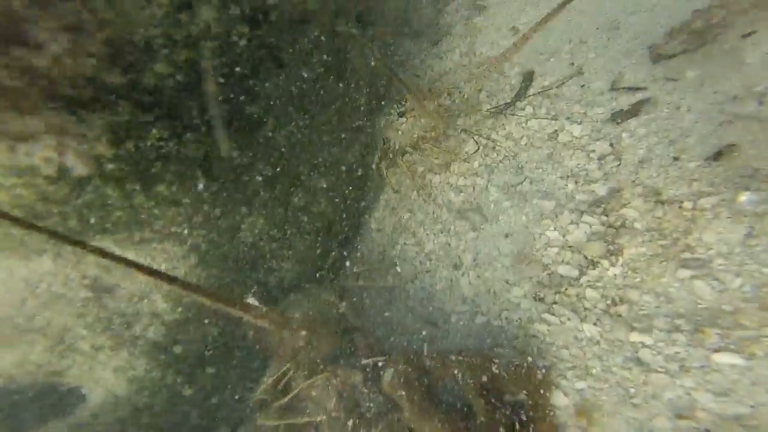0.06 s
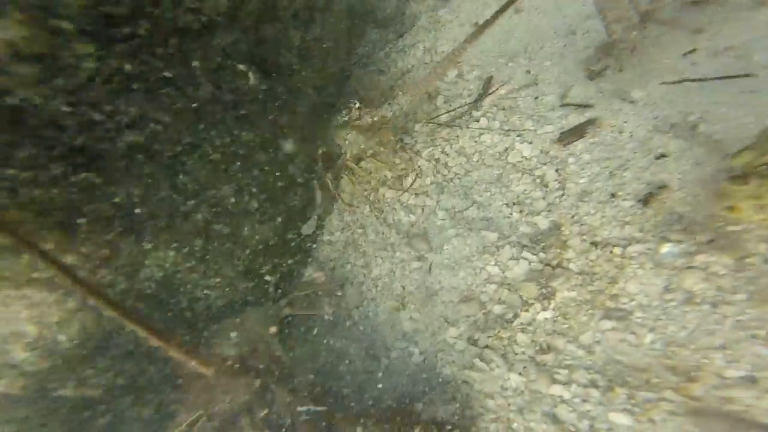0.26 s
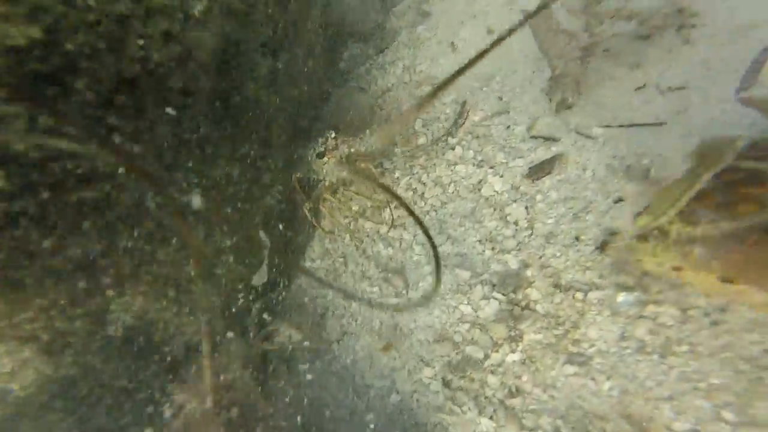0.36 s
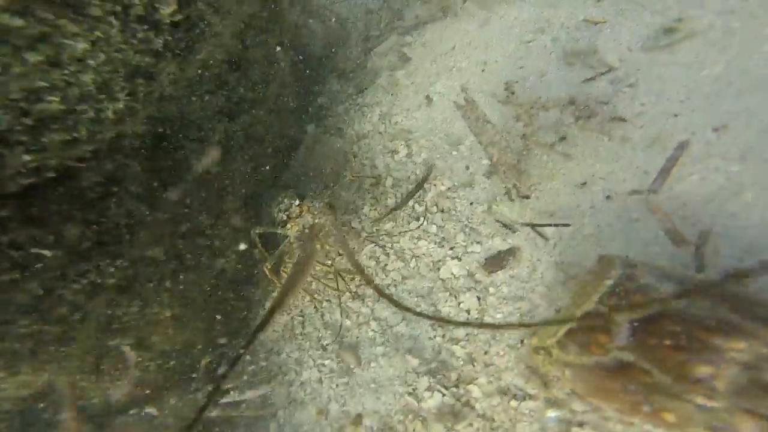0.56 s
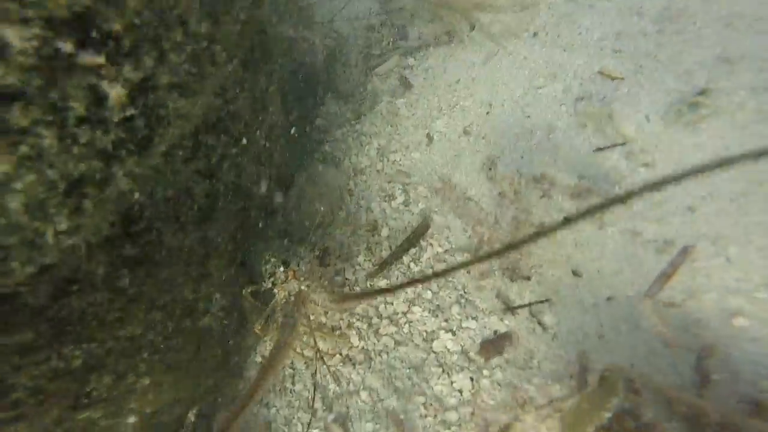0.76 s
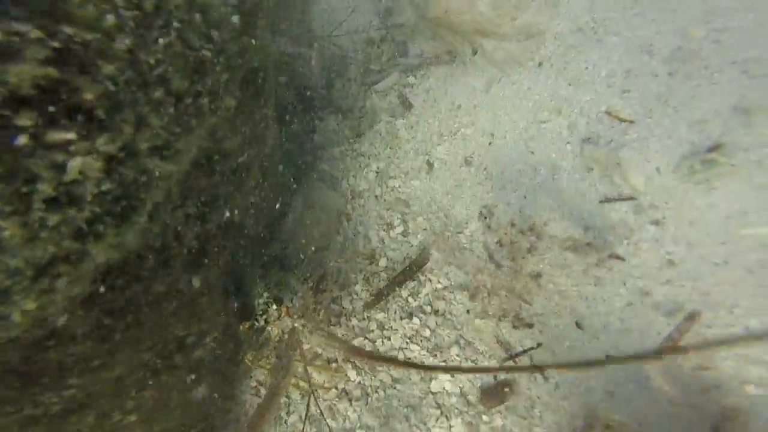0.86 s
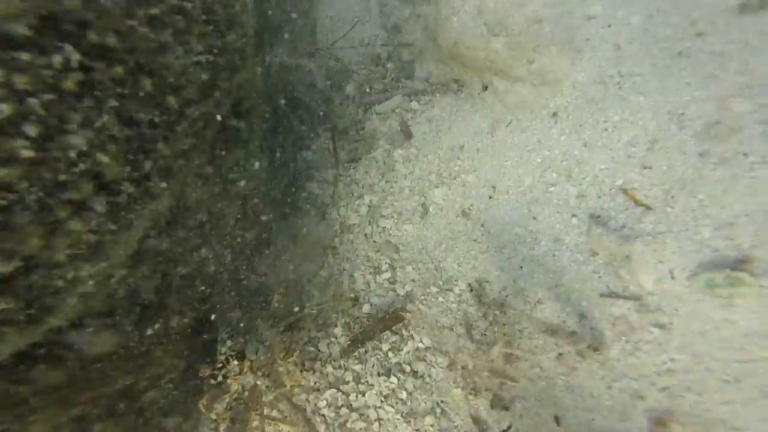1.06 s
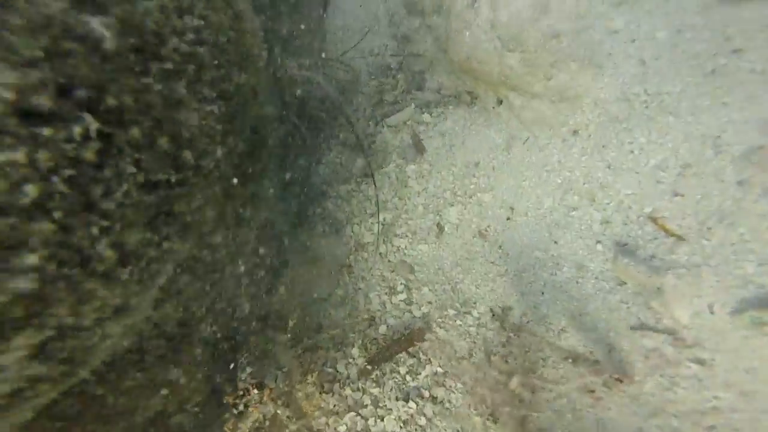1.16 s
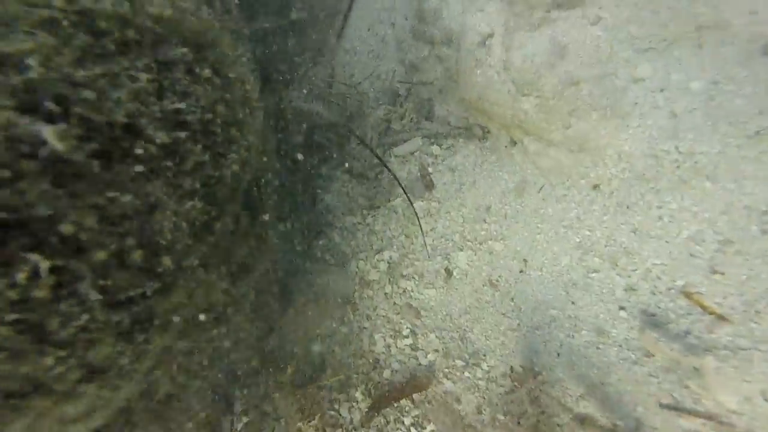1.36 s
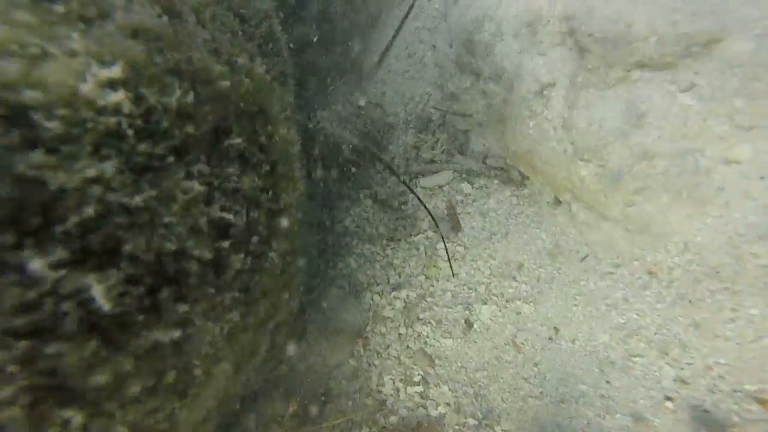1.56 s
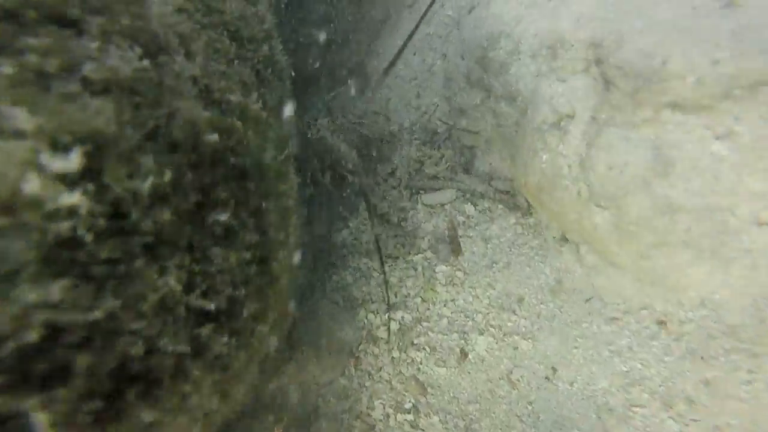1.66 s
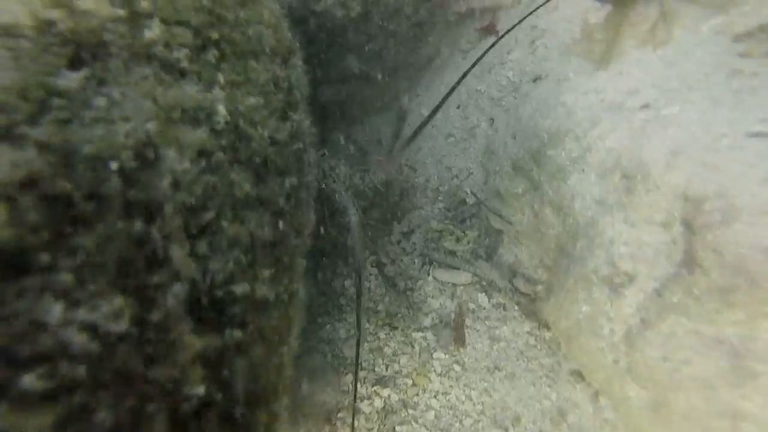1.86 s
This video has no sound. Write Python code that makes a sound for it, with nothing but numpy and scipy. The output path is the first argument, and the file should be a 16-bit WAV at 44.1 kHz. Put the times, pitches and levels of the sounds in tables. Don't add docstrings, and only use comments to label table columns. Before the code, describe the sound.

Housing scrape on stones, very close and boxy: a click, a brief rasp swelling into heavy thumps, then quiet underwater rumble with little bubbling blips, faint distant snaps and one weaker dull knock near the end.

```python
import sys
import numpy as np
from scipy import signal
from scipy.io import wavfile
from scipy.ndimage import uniform_filter1d

SR = 44100
rng = np.random.default_rng(int(sys.argv[2]) if len(sys.argv) > 2 else 0)


def voltage_ratio(level):
    return 10 ** (np.asarray(level, float) / 20)


def file_out(sig):
    cols = np.atleast_2d(sig).T
    lim = np.clip(cols, -1, 1)
    pcm = np.round(lim * 32767).astype(np.int16)
    wavfile.write(sys.argv[1], SR, pcm)


N = 83790

# f/Hz, t60/s, knock level/dB, grit level/dB
SHELL_MODES = [(464, 0.028, 12.5, 4.5), (657, 0.035, -21, 0.5), (1170, 0.011, -14, -34),
               (1637, 0.036, 10.5, 1.5), (2050, 0.019, -34, -4.5), (2600, 0.021, 5, -7.5),
               (3220, 0.0068, -0.5, -26), (4096, 0.035, -19, -16), (6400, 0.0046, -22, -24.5),
               (8100, 0.0073, -46, -26.5), (11200, .004, -45, -36)]


def evened(x):
    return x / np.sqrt(np.mean(x ** 2) + 1e-20)


def add(mix, start_s, sound):
    part = mix[max(round(start_s * SR), 0):][:len(sound)]
    part += sound[:len(part)]


def ring(force, hz, t60_s):
    r = np.exp(-np.log(1000) / (t60_s * SR))
    w = 2 * np.pi * hz / SR
    return signal.lfilter([0, np.sin(w)], [1, -2 * r * np.cos(w), r * r], force)


def bump(length_s):
    return np.hanning(max(round(length_s * SR), 3) + 2)


def noise(shape, size, patch_db, flicker_db):
    frames, hz = N // (size // 4) + 5, np.fft.rfftfreq(size, 1 / SR)
    real, imag, patch = rng.standard_normal((frames, len(hz), 3)).T
    patch = uniform_filter1d(patch, size=size // 100, axis=0)
    patch = evened(uniform_filter1d(patch, size=8, axis=1))
    flicker = evened(uniform_filter1d(rng.standard_normal(frames), size=3))
    f, db = np.transpose(shape)
    shape_db = np.interp(np.log(hz + 1), np.log(f + 1), db, -100, -100)[:, None]
    z = (real + 1j * imag) * voltage_ratio(shape_db + patch_db * patch + flicker_db * flicker)
    return evened(signal.istft(z, nperseg=size, noverlap=size * 3 // 4)[1][:N])


def minimum_phase_taps(shape):
    f, db = np.transpose(shape)
    hz = abs(np.fft.fftfreq(4096, 1 / SR))
    log_gain = np.log(voltage_ratio(np.interp(np.log(hz + 1), np.log(f + 1), db)))
    return np.fft.ifft(np.exp(np.conj(signal.hilbert(log_gain)))).real[:2048]


def grit():
    grains_per_s, spread_db = 12000, 3.5
    size = voltage_ratio(spread_db * np.minimum(rng.exponential(1, N), 3))
    hit = rng.random(N) < grains_per_s / SR
    return evened(hit * size * rng.choice([-1., 1.], N))


def scrape():
    # t/s, level/dB, brightness/(dB/octave)
    drag = [
        (0.2, -33, 0),
        (0.203, -33, -2),
        (.215, -37, 1.5),
        (0.259, -38, 0.5),
        (0.267, -29.5, 4),
        (0.292, -25.5, 2),
        (0.307, -28, 2.5),
        (0.327, -30, -1.5),
        (0.334, -53, -2),
    ]
    # mid t/s, length/s, level/dB
    brushes = [
        (0.355, 0.029, -58),
        (0.012, 0.019, -53),
        (0.158, 0.072, -50.5),
        (0.729, 0.069, -56.5),
        (0.826, 0.08, -54.5),
        (0.931, 0.071, -59),
        (1.132, 0.17, -63.5),
        (1.226, 0.066, -57.5),
        (1.509, 0.25, -62.5),
    ]
    # f/Hz, density/(dB/Hz)
    rasp_shape = [(120, -20.5), (200, 1.5), (616, -7.5), (987, -16), (2320, -14.5), (4210, -26.5),
                  (4530, -30.5), (8100, -38), (15300, -62)]
    clump_db, clump_s, grit_t60_ratio = 2.5, 0.0017, 0.52

    level = np.zeros(N)
    for mid_s, length_s, db in brushes:
        add(level, mid_s - length_s / 2, voltage_ratio(db) * bump(length_s))
    t = np.arange(N) / SR
    drag_s, drag_db, tilt = np.transpose(drag)
    level += voltage_ratio(np.interp(t, drag_s, drag_db, -120, -120))
    bright = np.interp(t, drag_s, tilt, 0, 0)
    clumps = evened(np.convolve(rng.standard_normal(N), bump(clump_s), "same"))
    level *= voltage_ratio(clump_db * clumps)

    taps = minimum_phase_taps(rasp_shape)
    rasp = signal.oaconvolve(grit() * level, taps / np.linalg.norm(taps))[:N]
    low = signal.lfilter(*signal.butter(2, 4000, fs=SR), rasp)
    out = low + (rasp - low) * voltage_ratio(2 * bright)
    for hz, t60_s, _, db in SHELL_MODES:
        lift = voltage_ratio(bright * np.log2(hz / 2000))
        damped_s = t60_s * grit_t60_ratio
        out += voltage_ratio(db - 2.5) * ring(grit() * level * lift, hz, damped_s) / np.sqrt(damped_s * SR / 28)
    return out


def clicks(table, width, decay_s):
    out, t = np.zeros(N), np.arange(400) / SR
    for start_s, db, hz in table:
        puff = rng.standard_normal(400) * np.exp(-t / decay_s)
        t60_s = 2.12 / (width * hz)
        click = ring(ring(puff, hz, t60_s / 2), hz, t60_s)
        add(out, start_s, voltage_ratio(db) * click / np.abs(click).max())
    return out


def catches():
    # t/s, level/dB, f/Hz
    caught = [(.208, -22.5, 1570), (.2245, -28.5, 1580), (.2355, -35, 4170), (.249, -26, 2030),
              (.2535, -29, 2200), (.2640, -24, 2310), (.2685, -21.5, 1880), (.2708, -20, 2320),
              (.2765, -22, 2230), (.2825, -20, 2020), (.2852, -15, 2530), (.2875, -21, 2300),
              (.2950, -16.5, 1800), (.2975, -18.5, 1700), (.3035, -19.5, 2010), (.309, -21.5, 1900),
              (.3153, -12.5, 2600), (.3165, -23, 2600), (1.5003, -43.5, 4000), (1.5012, -40, 3420),
              (1.502, -37.5, 2280), (1.5025, -45, 3970), (.2025, -31, 3630), (.322, -25, 2200),
              (.327, -24, 2310)]
    return clicks(caught, width=0.22, decay_s=0.0014)


def blow(contact_ms):
    t = np.arange(4000) / SR - .002
    return -np.exp(-.5 * (t / (contact_ms / 5000)) ** 2)


def knocks():
    # t/s, ring level/dB, push level/dB, contact/ms, brightness/(dB/octave)
    blows = [(.2003, -25.5, -40, 0.44, -0.5), (0.2021, -9.5, -18.5, 0.37, -3),
             (.2645, -25.5, -27, 0.33, 10), (.3141, -20, -6, .45, 3), (.31497, -26, -9, .4, 3),
             (.31553, -18, 2.5, .55, 2), (.3162, -20, 0, .58, 2), (.3168, -30, -12, .7, 0),
             (.3174, -30, -9, .4, 3), (1.5005, -40, -34, .3, 3), (1.50122, -38, -20, .6, 0),
             (1.50185, -45, -24, .45, 0), (1.50252, -42, -4, 1.1, -2), (1.5031, -50, -24, .6, 0),
             (1.5041, -50, -11, 1.6, -2), (.537, -39.5, -50, 0.32, -4.5), (.978, -41, -51, 0.58, 11),
             (1.563, -51, -39, 0.47, 8)]
    core_ratio, press_damps = .22, 1.1

    out = np.zeros(N)
    for hit_s, ring_db, push_db, contact_ms, tilt_db in blows:
        core = blow(core_ratio * contact_ms)
        free = 1 / (1 + press_damps * voltage_ratio(push_db))
        shell = np.zeros(len(core))
        for hz, t60_s, db, _ in SHELL_MODES:
            mode = ring(ring(core, hz, t60_s / 20), hz, t60_s * free)
            shell += voltage_ratio(db + tilt_db * np.log2(hz / 1000)) * mode / t60_s
        ringing = voltage_ratio(ring_db) * shell / np.abs(shell).max()
        add(out, hit_s - .002, ringing + voltage_ratio(push_db) * blow(contact_ms))
    return out


def shoves():
    pushes = [(0.048, -24, 0.015, 1), (0.161, -25, 0.014, -1), (.268, -16.5, 0.0071, 1),
              (0.283, -15.5, 0.0038, -1), (0.2854, -19, 0.0018, 1), (0.2899, -2.5, 0.0063, -1),
              (0.2956, -16, 0.0035, 1), (0.2987, -10, 0.0041, -1), (0.3011, -2.5, 0.0078, 1),
              (.3097, -7.5, 0.0026, 1), (0.3047, -9.5, 0.0057, -1), (0.3232, -12.5, 0.0029, 1),
              (0.3252, -12, 0.0027, 1), (0.336, -12.5, 0.0051, 1), (0.365, -20, 0.0098, -1),
              (0.376, -28, 0.011, 1), (0.3174, -4.5, 0.0068, 1), (0.3339, -6.5, 0.0051, -1),
              (0.343, -14, 0.0073, 1), (0.434, -35.5, 0.008, 1), (0.682, -29.5, 0.0046, 1),
              (0.798, -23, 0.01, 1), (1.218, -23, 0.024, -1), (1.482, -24, 0.01, -1),
              (1.491, -36, 0.0039, 1), (1.5065, -20, 0.0054, 1), (.845, -33, 0.007, -1),
              (.895, -28.5, .005, 1), (.93, -28, .005, 1), (1.512, -16.5, 0.0051, 1),
              (1.516, -21, 0.0045, -1), (1.553, -35, 0.015, -1), (1.565, -22.5, 0.0091, 1),
              (1.573, -30, 0.0074, -1), (1.585, -26, 0.011, 1), (1.598, -38, 0.012, -1),
              (1.606, -30, 0.0087, 1), (1.619, -30, 0.0079, -1)]
    # f/Hz, t60/s, level/dB
    sway = [(51.3, 0.16, -20), (117.2, 0.09, -22.5)]

    push = np.zeros(N)
    for mid_s, db, length_s, sign in pushes:
        add(push, mid_s - length_s / 2, np.sign(sign) * voltage_ratio(db) * bump(length_s))
    out = push.copy()
    for hz, t60_s, db in sway:
        out += voltage_ratio(db) * ring(push, hz, t60_s) * 2 * np.pi * hz / SR
    return out


def gurgles():
    # t/s, level/dB, f/Hz, length/s
    notes_of_air = [(0.026, -36, 550, 0.013), (0.151, -26.5, 443, 0.017), (0.2019, -25.5, 480, 0.011),
                    (.212, -27, 510, 0.019), (.5385, -32.5, 513, 0.0046), (.546, -40, 405, 0.015),
                    (0.581, -42, 448, .014), (.9, -34, 149, .025), (.435, -43.5, 149, 0.023),
                    (0.565, -32, 488, 0.02), (0.602, -28.5, 429, 0.028), (0.621, -29, 397, 0.019),
                    (0.63, -28, 493, 0.019), (0.652, -39, 352, 0.01), (0.658, -30, 420, 0.011),
                    (.672, -35, 388, 0.016), (0.101, -37.5, 470, .012), (0.792, -41, 420, .012),
                    (.82, -37.5, 417, 0.02), (1.094, -36.5, 433, 0.011), (1.163, -40, 630, .006),
                    (1.214, -37.5, 630, 0.0046), (.664, -39, 560, .008), (0.958, -39.5, 700, 0.015),
                    (1.311, -35, 403, 0.016), (1.444, -40, 473, 0.0073), (1.623, -39, 480, 0.014),
                    (1.686, -37.5, 441, .014), (1.815, -39, 415, 0.017), (.865, -39, 148, 0.014),
                    (0.936, -35.5, 429, 0.043), (1.159, -53, 650, 0.01), (1.40, -44, 171, 0.054),
                    (1.41, -36, 534, 0.018), (1.471, -34.5, 560, 0.012)]
    sag_per_s, rise_s = 2.83, 0.0018

    out = np.zeros(N)
    for start_s, db, hz, length_s in notes_of_air:
        t = np.arange(0, 2 * length_s, 1 / SR)
        shape = np.minimum(t / rise_s, 1) * np.exp(-(t / length_s) ** 2 * 2.05)
        add(out, start_s, voltage_ratio(db) * shape * np.sin(2 * np.pi * hz * t * (1 - sag_per_s * t / 2)))
    return out


def far_snaps():
    # t/s, level/dB, f/Hz
    snapped = [
        (.0518, -38.5, 3520),
        (.1245, -43, 4270),
        (.356, -43, 3440),
        (.5132, -48.5, 9000),
        (.767, -61, 12500),
        (1.1044, -55, 12000),
        (1.523, -59, 12100),
        (1.8642, -42.5, 2600),
        (1.8756, -52, 7500),
    ]
    return clicks(snapped, width=0.6, decay_s=0.0016)


def burbles():
    per_s, level_db, low_hz, high_hz = 90, -58, 329.7, 695
    out, shape = np.zeros(N), bump(0.019)
    t = np.arange(len(shape)) / SR
    for when, pitch, size in rng.random((400, 3)):
        hz = low_hz * (high_hz / low_hz) ** (pitch * pitch)
        level = voltage_ratio(level_db - 4.0 * np.log(size + .02))
        add(out, when * 400 / per_s, level * shape * np.sin(2 * np.pi * hz * t))
    return out


def sea():
    # t/s, rumble level/dB
    flow = [(0.0, -37.5), (0.216, -37), (0.28, -43), (0.422, -43), (0.486, -48.5), (0.66, -43.5),
            (0.852, -40.5), (0.92, -37), (1.492, -37.5), (1.65, -38.5), (1.9, -40)]
    # f/Hz, density/(dB/Hz)
    rumble_shape = [(8.8, -30), (15, 3.5), (47, 1), (107, -11), (145, -3.5), (209, -13.5), (300, -18),
                    (390, -35), (660, -120)]
    # f/Hz, density/(dB/Hz)
    wash_shape = [(150, -31), (250, -20), (360, -6.5), (425, -4), (722, -11.5), (833, -23.5), (1190, -24.5),
                  (1580, -27.5), (3500, -36), (4550, -45), (7700, -120)]
    wash_db, wash_follows = -47.5, 0.3

    flow_s, db = np.transpose(flow)
    flow_db = np.interp(np.arange(N) / SR, flow_s, db)
    rumble = voltage_ratio(flow_db) * noise(rumble_shape, size=2048, patch_db=2, flicker_db=2.0)
    wash = voltage_ratio(wash_db) * noise(wash_shape, size=1024, patch_db=1.72, flicker_db=1.75)
    return rumble + (wash + burbles()) * voltage_ratio(wash_follows * (flow_db - flow_db.mean()))


def hiss():
    # f/Hz, density/(dB/Hz)
    hiss_shape = [(1470, -17), (2500, -5.5), (2970, -17.5), (4840, -13.5), (5210, -13.5), (13000, -25.5),
                  (15000, -40)]
    return voltage_ratio(-68) * noise(hiss_shape, size=512, patch_db=1.5, flicker_db=1.0)


def scene():
    contact = scrape() + catches() + knocks()
    water = shoves() + gurgles() + far_snaps() + sea()
    return (contact + water)[None]


def ducking_db(dry):
    from_db, ratio, recover_db_per_s = -16, 0.38, 23
    power_db = 10 * np.log10(abs(uniform_filter1d(dry[0] ** 2, size=800)) + 1e-12)
    fall_db = np.arange(N) * recover_db_per_s / SR
    held_db = np.maximum.accumulate(power_db + fall_db) - fall_db
    over_db = np.maximum(held_db - from_db, 0)
    return ratio * uniform_filter1d(over_db, size=400)


def low_pass(x):
    return signal.sosfilt(signal.butter(12, 15270, fs=SR, output="sos"), x)


def record(dry):
    edge_hz, ceiling = 15300, 1.1
    x = (dry + hiss()) / voltage_ratio(ducking_db(dry))
    x = signal.lfilter(*signal.butter(2, 18, "high", fs=SR), x)
    x = signal.oaconvolve(x, signal.firwin(255, edge_hz, fs=SR)[None], "same")
    x = x / (1 + (x / ceiling) ** 6) ** (1 / 6)
    return low_pass(x)


dry = scene()
out = record(dry)
file_out(out)
```